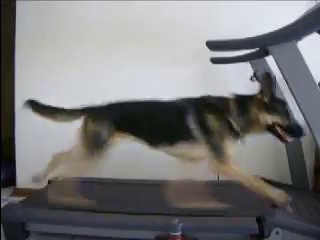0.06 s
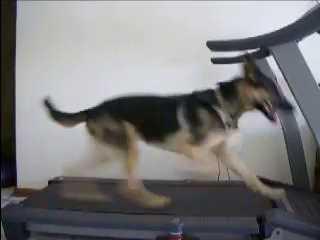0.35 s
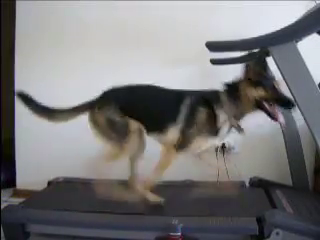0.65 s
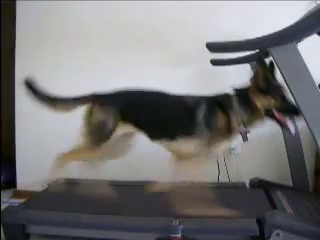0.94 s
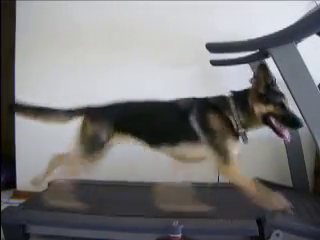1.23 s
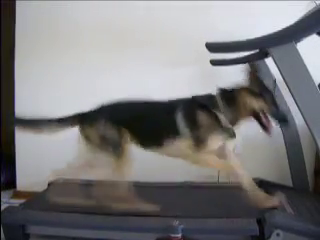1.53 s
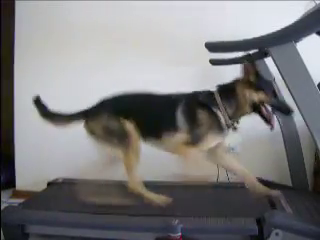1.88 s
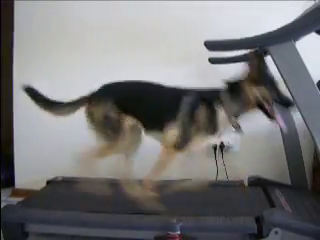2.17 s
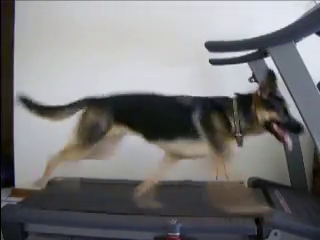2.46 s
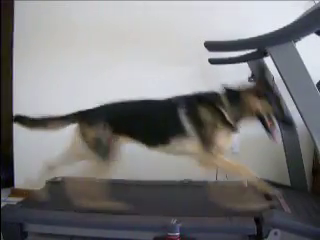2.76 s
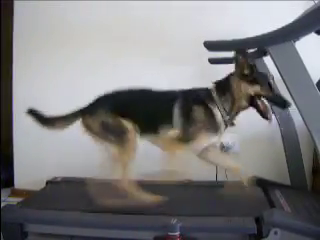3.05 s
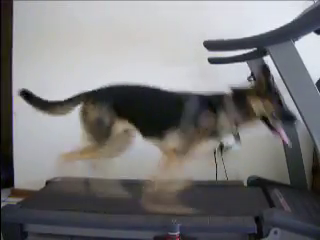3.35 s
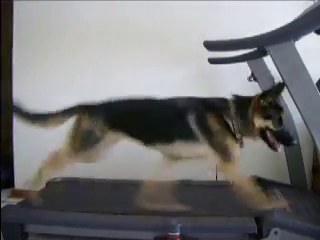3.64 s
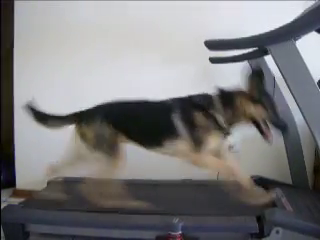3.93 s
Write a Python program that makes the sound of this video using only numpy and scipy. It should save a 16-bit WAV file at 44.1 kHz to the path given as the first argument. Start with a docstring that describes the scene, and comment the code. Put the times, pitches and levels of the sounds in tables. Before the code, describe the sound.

A large dog gallops on a treadmill in a small room. A microphone pop comes right at the start, then the belt's rumble and motor hum fade in by about 0.8 seconds. Paws thump and scuff in quick groups, one stride roughly every 0.4 seconds, until the end at about 4 seconds. Brief claw squeaks and thin collar jingles accompany the strides, over a faint high whine.

```python
"""A pop is heard first as the camera starts; over its faint whine, a large dog galloping on a motor
treadmill in a small room fades in. Sliding friction makes the belt rumble, and the rotating drive hums.
In each stride two hind paws scuff and two front paws land; the impacts thump the deck, and heavy ones
excite its low resonance. Claws squeak on the belt by stick-slip, and the collar's metal jingles thinly."""
import sys
import numpy as np
from scipy import signal
from scipy.fft import rfft, irfft, next_fast_len
from scipy.io import wavfile
from scipy.ndimage import uniform_filter1d, map_coordinates

SR = 44100
rng = np.random.default_rng(int(sys.argv[2]) if len(sys.argv) > 2 else 0)


def int16_out(signal):
    """Quantize to a 16-bit WAV file."""
    q = np.round(np.clip(np.atleast_2d(signal).T, -1, 1) * 32767)
    wavfile.write(sys.argv[1], SR, q.astype(np.int16))


N = 176400
T = np.arange(N) / SR

# lines of the camera's whine (f/Hz, level/dB, width/Hz)
WHINE_LINES = [(4398, -72, 20), (4942, -70, 12), (5897, -60, 24), (7402, -76, 20), (9959, -73, 20),
               (10277, -66.5, 45), (11780, -82, 20)]
# spectrum of the camera's hiss (f/Hz, relative level/dB)
HISS_SPECTRUM = [(100, -2), (2000, -7), (6000, -9), (10000, -9), (12000, -26)]
# opening fade (t/s, gain/dB)
FADE_IN = [(.04, -21.5), (.2, -15), (.35, -10), (.5, -6.5), (.65, -3.5), (.8, -1)]
# spectrum of the belt sliding on the deck (f/Hz, relative level/dB)
BELT_SPECTRUM = [(15, -43), (25, -6.5), (74, -14.5), (98, -7.5), (178, -3.5), (386, -6.5), (475, -2.5),
                 (648, -7.5), (954, -2), (1370, -10.5), (1970, -13), (2420, -22), (3380, -27.5),
                 (4380, -29.5), (6130, -28.5), (6620, -34), (8580, -38), (10300, -37), (12000, -60),
                 (15600, -88), (22000, -120)]
# hum of motor and rollers (f/Hz, relative level/dB, width/Hz)
DRIVE_LINES = [(72.5, -44, 7), (98.4, -50.5, 6), (188.8, -49, 7), (298, -44.5, 12), (346.7, -43.5, 8),
               (440.4, -47, 7), (469, -40, 8), (478.7, -40.5, 8), (553.5, -45.5, 12), (787.5, -44, 20),
               (925, -36, 8), (997, -36, 6), (1021, -42, 42), (1114, -46, 25), (1533, -48.5, 20),
               (2024, -53, 25)]
# slow swell of belt and drive together (t/s, gain/dB)
TREADMILL_GAIN = [(.8, 1), (1.0, 0.6), (1.42, 0.5), (1.59, 0.5), (1.63, 0), (1.72, 0), (1.93, 1.5),
                  (2.11, -0.5), (2.2, .5), (2.49, 0.5), (2.54, -0.5), (2.68, 1), (2.8, 1), (2.9, 0),
                  (3.15, 1.5), (3.4, 0.5), (3.6, 1), (3.9, 0.5)]
# jingles of the collar (t/s, relative level/dB, f/Hz, T60/s)
COLLAR_STRIKES = [(0.518, -31, 9990, 0.066), (.613, -42, 9970, .1), (.678, -35.5, 5613, .22),
                  (.688, -41, 9950, 0.15), (.984, -42, 9960, 0.065), (1.1, -50, 9950, .15),
                  (1.15, -47, 9545, .07), (1.38, -41, 9960, 0.076), (1.552, -48, 9970, .07),
                  (1.738, -41, 9980, 0.044), (1.972, -45, 9970, .09), (2.002, -52, 9950, .1),
                  (2.045, -40, 9960, .07), (2.155, -40.5, 9980, 0.054), (2.224, -44.5, 9545, 0.1),
                  (2.568, -40, 9980, .05), (2.68, -41, 9960, 0.07), (2.86, -43, 9960, .12),
                  (2.946, -36, 10150, 0.036), (3.232, -47, 9980, .05), (3.275, -37, 10000, .04),
                  (3.382, -43, 9960, .07), (3.428, -43, 9950, .12), (3.663, -32.5, 9970, .09),
                  (3.725, -48, 9950, .08), (3.858, -45, 9545, .12), (3.864, -38, 9950, 0.12)]
# modes of the collar's metal (frequency ratio, relative level/dB)
COLLAR_MODES = [(1, 0.5), (1.213, -26), (.909, -13)]
# spectrum of metal rubbing on metal (f/Hz, relative level/dB)
RUB_SPECTRUM = [(4000, -30), (7000, -10), (10000, 2), (12000, -14)]
# claws slipping on the belt (t/s, relative level/dB)
CLAW_SLIPS = [(0.144, -27), (0.4244, -39), (0.5344, -30.5), (0.7906, -34), (0.8101, -30.5), (0.916, -33),
              (1.185, -28), (1.2979, -34), (1.5714, -32.5), (1.6826, -30), (1.9744, -31.5), (2.0652, -39),
              (2.0815, -30.5), (2.373, -30.5), (2.4838, -34), (2.7766, -32.5), (2.886, -34), (3.1777, -29),
              (3.2824, -39), (3.5703, -32.5), (3.69, -31)]
# heavy footfalls that ring the deck (t/s, relative level/dB, f/Hz)
DECK_BOOMS = [(.812, -21.5, 167), (1.158, -26, 188), (1.576, -31, 173), (1.945, -23.5, 174),
              (2.254, -25, 168), (2.336, -23, 164), (3.515, -25, 225), (3.574, -31, 176), (3.905, -24, 199)]
# spectra of hind brush, front scuff, deck thump and belt slap (f/Hz, relative level/dB)
BRUSH_SPECTRUM = [(1000, -6), (2500, 5), (4000, -4.5), (5300, 2.5), (7500, -7), (10000, -12), (12000, -27)]
SCUFF_SPECTRUM = [(800, -30), (2000, -3.5), (3000, 8), (4000, -4), (5400, -1), (7000, -4), (10000, -20),
                  (12000, -35)]
THUMP_SPECTRUM = [(30, -15), (90, -18), (130, 1.5), (180, -2.5), (260, -3.5), (450, -17), (900, -13),
                  (3000, -80)]
SLAP_SPECTRUM = [(150, -5), (400, -5.5), (800, 2.5), (1300, -4), (1900, -1.5), (2600, -15), (5000, -50)]
# hind paw landings, levels relative (t/s, brush level/dB, thump level/dB, brush T60/s)
HIND_LANDINGS = [(.25, -39, -34, 0.12), (.636, -39.5, -41, 0.12), (.694, -36, -32, 0.095),
                 (1.016, -42, -42, .08), (1.083, -36.5, -30.5, .08), (1.41, -40, -56, .08),
                 (1.479, -50, -38, .08), (1.792, -39.5, -41, .08), (1.854, -34.5, -35, .07),
                 (2.184, -41, -31, .08), (2.252, -34, -30, 0.064), (2.589, -38.5, -32, .09),
                 (2.651, -38.5, -32, .08), (2.989, -40, -35, .1), (3.05, -36.5, -36, 0.063),
                 (3.392, -41, -47, 0.087), (3.469, -37.5, -26.5, .08), (3.808, -40.5, -39, .13),
                 (3.845, -43, -28, .09), (3.964, -35, -32, .07)]
# front paw landings, levels relative (t/s, scuff level/dB, thump level/dB, slap level/dB)
FRONT_LANDINGS = [(0.4174, -30, -26, -30.5), (0.525, -24, -27.5, -31), (0.7966, -30.5, -27.5, -28.5),
                  (0.915, -29.5, -33, -31.5), (1.1593, -29.5, -28, -28), (1.296, -28, -32, -26.5),
                  (1.5464, -30, -26, -27.5), (1.6786, -27.5, -28.5, -27), (1.969, -31, -32.5, -34),
                  (2.0694, -31, -30, -33), (2.3614, -29, -27.5, -29), (2.4753, -29.5, -34.5, -33),
                  (2.771, -31, -36, -30), (2.8769, -29, -32.5, -28.5), (3.1747, -39, -36, -31),
                  (3.2774, -28.5, -36, -32), (3.5594, -42, -34, -27.5), (3.692, -29, -46, -30)]


def amp(db):
    """Amplitude ratio of a level in decibels."""
    return 10 ** (np.asarray(db) / 20)


def unit_rms(x):
    """Normalisation to unit mean power."""
    return x / np.sqrt(np.mean(x ** 2) + 1e-20)


def wobble(rate):
    """Smooth random modulation: cubic interpolation through `rate` Gaussian values a second."""
    return map_coordinates(rng.standard_normal(16000), [T * rate], order=3)


def filtered(x, response):
    """Linear filtering: the spectrum is multiplied by a frequency response."""
    size = next_fast_len(N + SR // 2)
    return irfft(rfft(x, size) * response(np.fft.rfftfreq(size, 1 / SR)), size)[:N]


def noise(spectrum, patchy_db=0, grain_db=0):
    """Spectral shaping of white noise to rms 1, modulated by fine grain and time-frequency patches."""
    grainy = rng.standard_normal(N) * amp(grain_db * wobble(900))
    frames = signal.stft(grainy, nperseg=512)[2]
    patches = uniform_filter1d(rng.standard_normal(frames.shape), size=5, axis=0)
    patches = unit_rms(uniform_filter1d(patches, size=8, axis=1))
    patchy = signal.istft(frames * amp(patchy_db * patches), nperseg=512)[1][:N]
    freqs, db = np.transpose(spectrum)
    return unit_rms(filtered(patchy, lambda hz: amp(np.interp(np.log(hz + 1), np.log(freqs), db))))


def burst(start, attack_s, t60):
    """Envelope of a damped vibration: exponential rise and decay, with peak 1."""
    age = np.maximum(T - start, 0)
    shape = (1 - np.exp(-age / attack_s)) * np.exp(-np.log(1000) * age / t60)
    return shape / (shape.max() + 1e-12)


def bursts(times, levels, lead_s, attack_s, t60):
    """Incoherent summation: the envelopes of separate contacts add in power."""
    return np.sqrt(sum((amp(db) * burst(t - lead_s, attack_s, t60)) ** 2 for t, db in zip(times, levels)))


def tones(lines, noise_share):
    """Line broadening: each tone wavers in frequency, and a share of its power is narrow-band noise."""
    out = np.zeros(N)
    for hz, db, width in lines:
        phase = 2 * np.pi * (np.cumsum(hz + width / 4 * wobble(width)) / SR + rng.random())
        narrow_noise = wobble(1.5 * width) + 1j * wobble(1.5 * width)
        phasor = np.sqrt(1 - noise_share) + np.sqrt(noise_share / 2) * narrow_noise
        out += amp(db) * unit_rms(np.real(phasor * np.exp(1j * phase)))
    return out


def camera_noise():
    """Self-noise: the camera adds faint high tones and broadband hiss."""
    return tones(WHINE_LINES, noise_share=0.061) + amp(-60) * noise(HISS_SPECTRUM)


def camera_pop(start, step=0.31, swell=0.18, rise_s=0.0037, decay_s=0.084):
    """Switch-on transient: an offset jumps up, swells briefly and relaxes exponentially."""
    age = np.maximum(T - start, 0)
    return (step + swell * (1 - np.exp(-age / rise_s))) * np.exp(-age / decay_s) * (T >= start)


def room(x, t60=0.35, tail_db=-11.5):
    """Reverberation: reflections from bare walls merge into a short, exponentially decaying tail."""
    t = T[:SR // 2]
    tail = rng.standard_normal(len(t)) * np.exp(-np.log(1000) * t / t60) * (t > 0.004)
    return x + amp(tail_db) * signal.fftconvolve(x, tail / np.linalg.norm(tail))[:N]


def treadmill():
    """Sliding friction of belt on deck gives broadband rumble; rotation of motor and rollers gives hum."""
    belt = noise(BELT_SPECTRUM, patchy_db=1, grain_db=1)
    belt *= amp(-27 + 0.78 * wobble(34.65))  # the level flutters slightly
    hum = tones(DRIVE_LINES, noise_share=0.2)
    return amp(np.interp(T, *np.transpose(TREADMILL_GAIN))) * (belt + hum)


def collar(waver_hz=34.5):
    """Free vibration: small metal parts scrape, then ring in one high mode and two weak inharmonic ones."""
    drift_cycles = np.cumsum(waver_hz * wobble(300)) / SR
    rings, contact = np.zeros(N), np.zeros(N)
    for start, db, hz, t60 in COLLAR_STRIKES:
        phase = 2 * np.pi * (hz * T + drift_cycles)
        note = sum(amp(level) * np.sin(ratio * phase) for ratio, level in COLLAR_MODES)
        rings += amp(db - 2.5) * burst(start - 0.002, attack_s=0.0076, t60=t60) * note
        contact += amp(db - 14) * burst(start - 0.006, attack_s=0.008, t60=0.046)
    chatter = amp(2.7 * wobble(300) + 1.5 * wobble(80))
    return rings * chatter + contact * noise(RUB_SPECTRUM, grain_db=4.5)


def claws(squeak_hz=6156, sag_hz_per_s=9000, waver_hz=132):
    """Stick-slip on rubber: a rough squeak sags in pitch, with a softer subharmonic an octave below."""
    out, waver = np.zeros(N), waver_hz * wobble(500)
    for start, db in CLAW_SLIPS:
        hz = squeak_hz - sag_hz_per_s * np.clip(T - start, 0, 0.022) + waver
        phase = 2 * np.pi * np.cumsum(hz) / SR
        squeak = burst(start - 0.003, attack_s=0.0032, t60=0.05) * np.sin(phase)
        subharmonic = amp(-9.5) * burst(start, attack_s=0.006, t60=0.19) * np.sin(phase / 2)
        out += amp(db - 4.5) * (squeak + subharmonic)
    roughness = amp(2.2 * wobble(350))
    return out * roughness


def deck():
    """Damped resonance: the board flexes under a heavy footfall and rings briefly at a low pitch."""
    return sum(amp(db) * burst(start, attack_s=0.0081, t60=0.097) * np.sin(2 * np.pi * hz * (T - start))
               for start, db, hz in DECK_BOOMS)


def hind_paws():
    """Friction and light impact: each hind paw brushes the belt briefly and thumps the deck."""
    brush_power = sum((amp(db) * burst(start, attack_s=0.0061, t60=t60)) ** 2
                      for start, db, _, t60 in HIND_LANDINGS)
    times, _, thump_db, _ = np.transpose(HIND_LANDINGS)
    thump = bursts(times, thump_db - 3.5, lead_s=0.0034, attack_s=0.013, t60=0.26)
    return (thump * noise(THUMP_SPECTRUM)
            + np.sqrt(brush_power) * noise(BRUSH_SPECTRUM, patchy_db=3, grain_db=1.5))


def front_paws():
    """Impact excitation: each front paw gives a high scuff, a low deck thump and a mid-range belt slap."""
    times, scuff_db, thump_db, slap_db = np.transpose(FRONT_LANDINGS)
    scuff = bursts(times, scuff_db - 11, lead_s=0.0058, attack_s=0.014, t60=0.17)
    thump = bursts(times, thump_db - 0.5, lead_s=0.0037, attack_s=0.018, t60=0.24)
    slap = bursts(times, slap_db - 0.5, lead_s=0.0038, attack_s=0.012, t60=0.21)
    return (scuff * noise(SCUFF_SPECTRUM, patchy_db=3, grain_db=3)
            + thump * noise(THUMP_SPECTRUM)
            + slap * noise(SLAP_SPECTRUM, grain_db=3))


def scene():
    """Superposition: machine and deck booms arrive directly; paws, claws and collar also reverberate."""
    return (treadmill() + deck() + room(front_paws() + hind_paws() + claws() + collar()))[None]


def record(dry):
    """Gating and band limiting: the camera starts with a pop, fades the scene in and cuts the top treble."""
    start_s, cutoff_hz, edge_hz = 0.0363, 12200, 30
    faded = dry[0] * amp(np.interp(T, *np.transpose(FADE_IN)))
    sound = (faded + camera_noise()) * (T >= start_s) + camera_pop(start_s)
    return filtered(sound, lambda hz: 0.5 - 0.5 * np.tanh((hz - cutoff_hz) / (2 * edge_hz)))[None]


dry = scene()
out = record(dry)
int16_out(out)
```